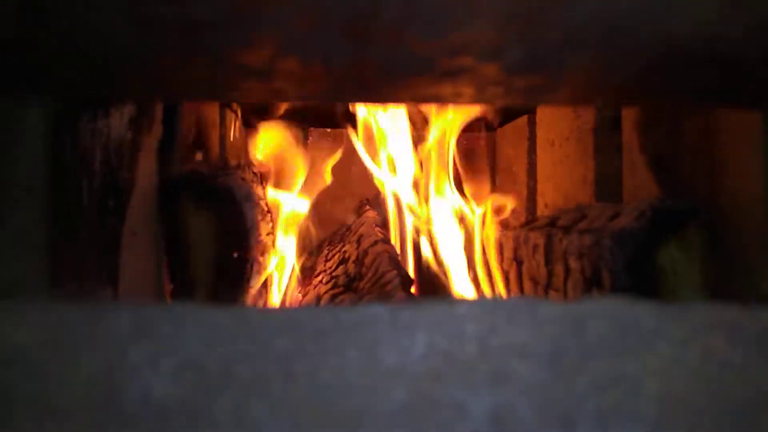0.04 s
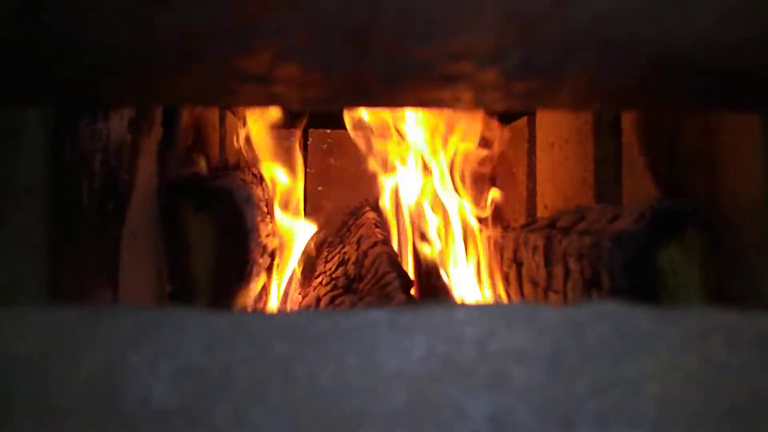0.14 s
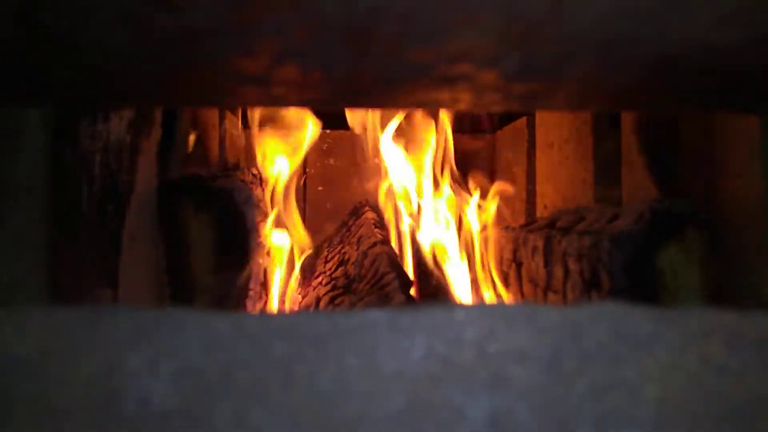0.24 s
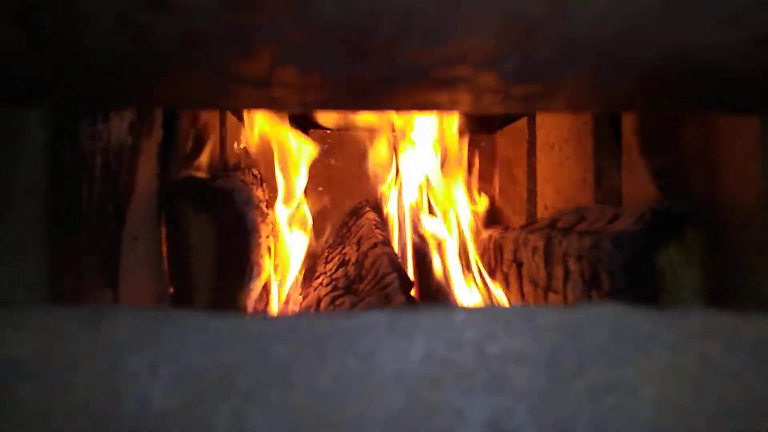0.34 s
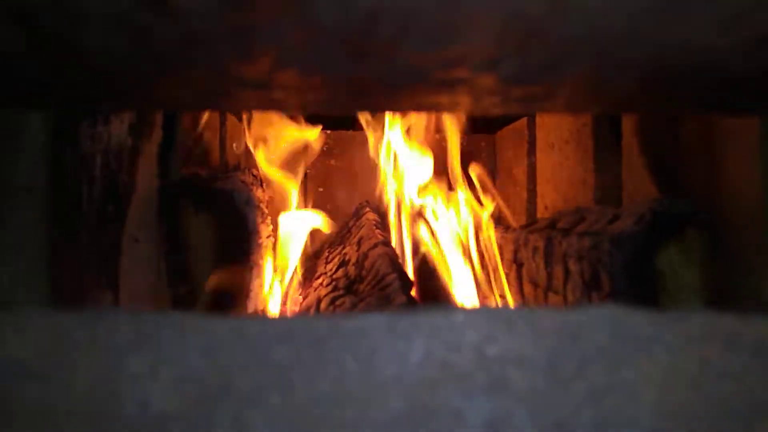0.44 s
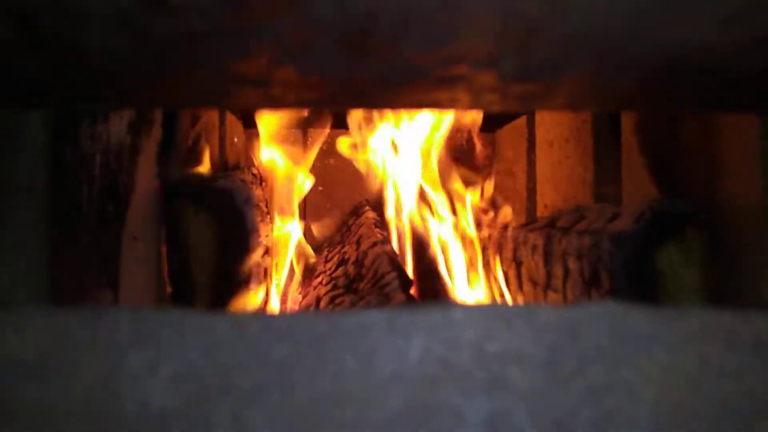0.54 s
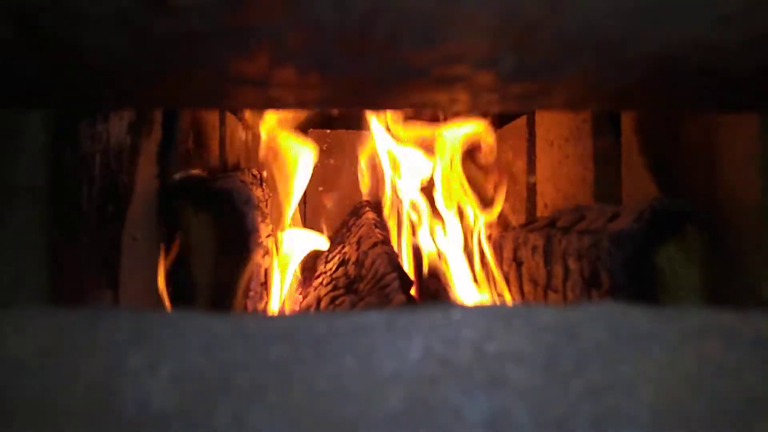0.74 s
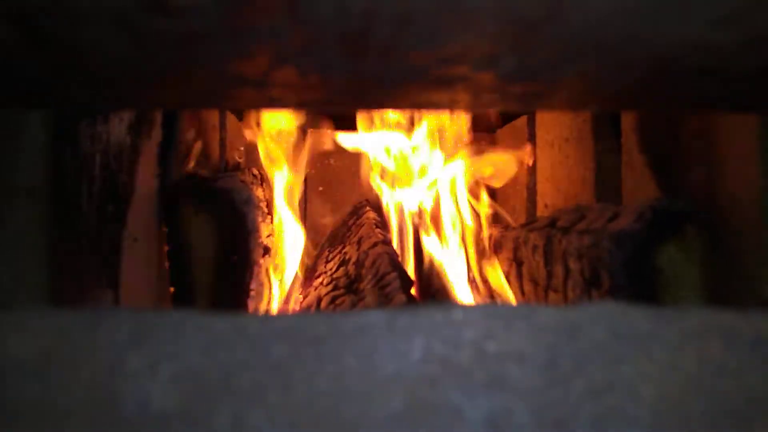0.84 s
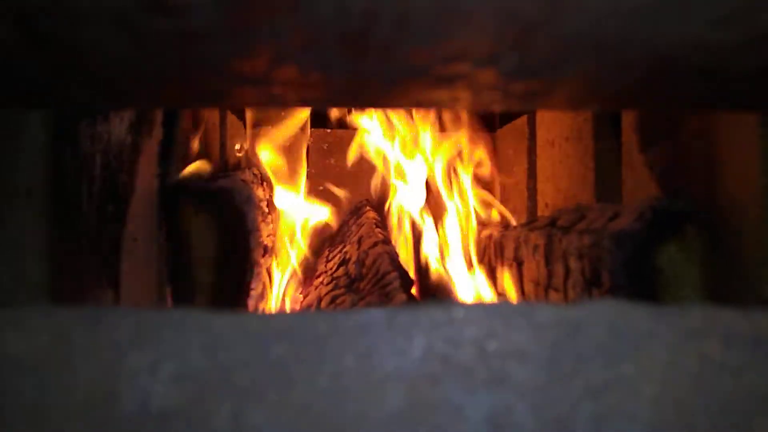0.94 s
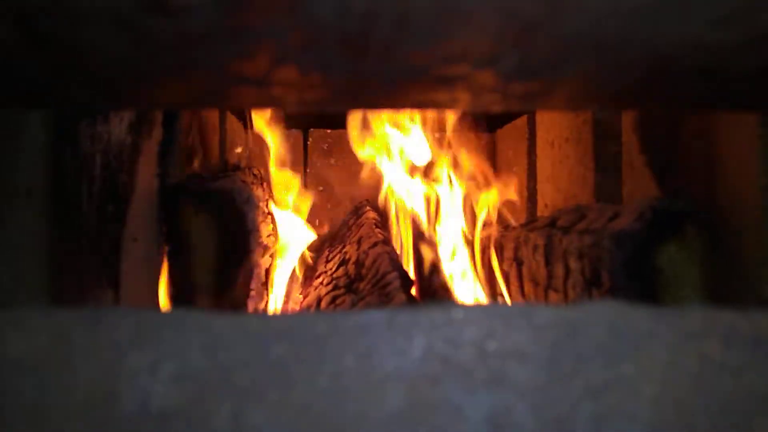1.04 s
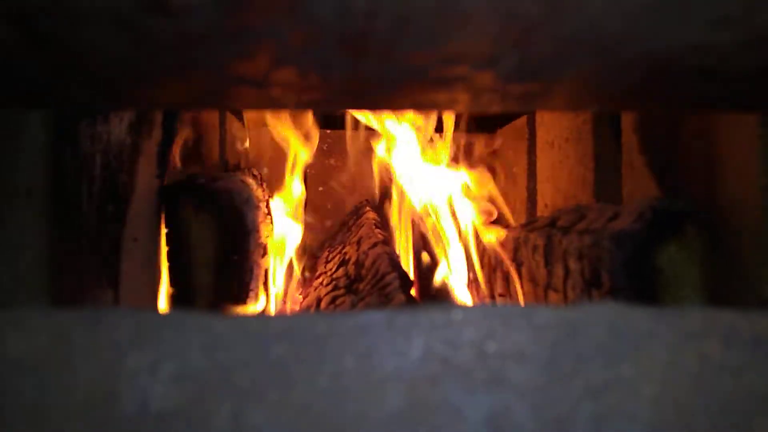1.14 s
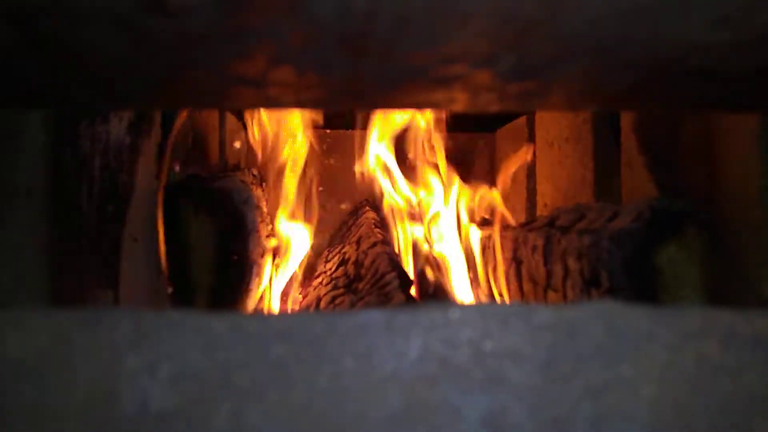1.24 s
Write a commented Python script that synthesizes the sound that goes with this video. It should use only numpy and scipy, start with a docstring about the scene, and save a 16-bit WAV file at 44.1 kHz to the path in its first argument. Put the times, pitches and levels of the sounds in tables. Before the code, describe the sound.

A log fire crackles close by in an indoor firebox: sharp bright ticks, a loud snapping pop early, a duller, punchier pop later, then a cluster of ticks over faint sizzling and steady low rumble.

```python
"""Crackling logs in a firebox

Logs burn in the open firebox of a boiler, indoors. Pockets in the wood burst: many small bright ticks
and two loud pops, made of shaped noise bursts and fading tones, with echoes from the firebox and room.
Faint knocks of settling embers are dull noise with a short ring. Gas sizzles out in spurts of bright noise
among random tiny cracks, and the flames rumble and flutter softly below as low noise."""
import sys
import numpy as np
from scipy import signal
from scipy.fft import rfft, irfft
from scipy.io import wavfile
from scipy.ndimage import uniform_filter1d

SR = 44100
rng = np.random.default_rng(int(sys.argv[2]) if len(sys.argv) > 2 else 0)


def wrap_up_sound(samples):
    """Save the sound to the file named by the first command line argument, as 16-bit audio."""
    columns = np.atleast_2d(samples).T
    # keep every value between -1 and 1, then stretch to whole-number steps
    tamed = np.clip(columns, -1, 1)
    steps = np.round(tamed * 32767).astype(np.int16)
    wavfile.write(sys.argv[1], SR, steps)


N = 57330
T = np.arange(N) / SR  # time of each sample, in seconds

# Bright hiss of escaping gas, also used for sharp cracks: pitch_hz, level_db (per Hz, relative)
HISS_SPECTRUM = [(2000, -33), (4000, -25.5), (5300, -13), (7500, -6), (8800, -2), (10000, 3.5), (12000, 0),
                 (16000, -3)]
# How lively the fine crackle and the sizzle are over time: time_s, change_db
ACTIVITY = [(0, 1.5), (.19, 7), (.3, 11), (.55, 1.5), (.64, 7), (.70, -12), (.80, -5), (.86, 19),
            (1.06, 1.5), (1.15, 12), (1.3, -1)]
# In all names, T60 is the time a sound takes to fade by 60 dB; HOLD runs from the start of the sound.
TICK_T60_S = 0.038
SPIKE_T60_S = 0.002
POP_ATTACK_S, POP_HOLD_S = 0.00062, 0.0019
FIREBOX_T60_S, ROOM_T60_S = 0.11, 0.42
RIPPLE = rng.standard_normal(2000)  # random strengths of the firebox's countless weaker resonances


def pops():
    """A pocket bursts: a snap, ringing wood, echoes, and a punch of gas that makes the firebox boom."""
    # Loud pops: start_s, snap_db, splinter_ring_db, log_ring_db, woody_body_db, echo_db, late_echo_db,
    # punch_db, boom_db, boom_hz, boom_t60_s, thump_db
    pop_list = [(0.2334, -9, -15.5, -53, -41.5, -31.5, -63, -40, -42.5, 139.9, .13, -51),
                (0.8914, -24, -49, -32.5, -42, -36.5, -63, -26, -36.5, 103.6, 0.064, -41)]
    out = np.zeros(N)
    for (start, snap_db, splinter_db, log_db, body_db, echo_db, late_db,
         punch_db, boom_db, boom_hz, boom_t60, thump_db) in pop_list:
        out += snap(start, snap_db)
        out += wood_ringing(start, splinter_db, log_db)
        out += woody_body([(start, body_db)])
        out += pop_echoes(start, echo_db, late_db)
        out += from_db(punch_db) * punch(start)
        out += from_db(boom_db) * boom(start, boom_hz, boom_t60)
        out += from_db(thump_db) * thump(start)
    return out


def snap(start, level_db):
    """The wood tears with a burst of bright noise, sharpened by a very short hiss at its front."""
    # Colour of the snap: pitch_hz, level_db (per Hz, relative)
    snap_spectrum = [(3300, -24), (4500, -22.5), (6000, -10), (8000, -5), (9600, 4.5), (11200, 3.5),
                     (13000, -16), (16000, -28)]
    burst = even(noise(snap_spectrum), size=100) * envelope(start, POP_ATTACK_S, POP_HOLD_S, t60=0.021)
    spike_level = from_db(-1) * envelope(start, POP_ATTACK_S, POP_ATTACK_S, SPIKE_T60_S)
    spike = even(noise(HISS_SPECTRUM), size=100) * spike_level
    return from_db(level_db) * (burst + spike)


def wood_ringing(start, splinter_db, log_db):
    """The splinter and the log each vibrate at their own pitches, and the room holds on to the log."""
    # Tones of the splintering wood: pitch_hz, level_db, t60_s
    splinter_modes = [(235, -29.5, 0.021), (523, -24, .05), (701, -27, 0.089), (875, -27.5, 0.033),
                      (1213, -33, .03), (1920, -24, .03), (2286, -29, 0.046), (5112, -15.5, .022),
                      (5974, -11.5, .03), (8230, -13.5, 0.043), (9320, -5, .04), (10220, 2.5, .028),
                      (10900, 4, 0.013), (11620, -4.5, .015)]
    # Tones of a log: pitch_hz, level_db, t60_s
    log_modes = [(536, -6.5, 0.018), (668, -7, 0.035), (1464, -5.5, 0.034), (2406, -8.5, 0.028),
                 (4420, -9, .025), (4780, -5, 0.021), (5970, 1, .02), (7230, 4, .028), (9610, 9.5, .03)]
    splinter = from_db(splinter_db) * ring(splinter_modes, start)
    log = from_db(log_db) * ring(log_modes, start)
    log_echo = from_db(log_db - 24) * ring_echo(log_modes, start)
    return splinter + log + log_echo


def ring(modes, start):
    """One burst sets several tones ringing, each fading at its own speed."""
    out = np.zeros(N)
    for hz, db, t60 in modes:
        tone = np.sin(2 * np.pi * (hz * T + rng.random()))  # random starting point in the cycle
        out += from_db(db) * tone * envelope(start, POP_ATTACK_S, POP_HOLD_S, t60)
    return out


def ring_echo(modes, start):
    """The room holds on to the ringing as wavering bands around each tone, the low ones favoured."""
    tilt_db, waver_rate_hz = 2, 130  # loss per octave; new random points per second
    bands = np.zeros(N)
    for hz, db, _ in modes:
        sine_part = drift(waver_rate_hz) * np.sin(2 * np.pi * hz * T)
        cosine_part = drift(waver_rate_hz) * np.cos(2 * np.pi * hz * T)
        bands += from_db(db - tilt_db * np.log2(hz / 1000)) * (sine_part + cosine_part)
    return bands * envelope(start, 0.01, 0.004, ROOM_T60_S)


def pop_echoes(start, echo_db, late_db):
    """The snap rattles round the firebox and room; a dull echo returns from the far end of the room."""
    # Colour of the bright echo: pitch_hz, level_db (per Hz, relative)
    echo_spectrum = [(3300, -21.5), (4800, -17), (6400, -14), (8600, -1.5), (9700, 0.5), (10700, -2),
                     (12000, -15.5), (14000, -25.5), (16000, -22.5)]
    # Colour of the dull late echo: pitch_hz, level_db (per Hz, relative)
    late_spectrum = [(250, -5.5), (400, 12), (520, -2), (680, 11.5), (850, 3.5), (1200, -11), (2500, -8),
                     (5000, -31)]
    room_db, late_delay_s = -11.5, 0.082  # room level relative to the firebox
    echo = noise(echo_spectrum) * tail(start, echo_db, echo_db + room_db)
    late_level = from_db(late_db) * envelope(start + late_delay_s, 0.0098, 0.017, t60=0.14)
    return echo + noise(late_spectrum) * late_level


def punch(start):
    """The burst of gas is one push and pull of the air, thrown back by the firebox wall."""
    length_s, return_delay_s, return_db = 0.0047, 0.017, -17

    def wave(age):
        return np.sin(2 * np.pi * np.clip(age / length_s, 0, 1))
    return wave(T - start) + from_db(return_db) * wave(T - start - return_delay_s)


def boom(start, hz, t60):
    """The firebox answers the punch with one low tone, slightly late."""
    boom_start = start + 0.023
    return np.sin(2 * np.pi * hz * (T - boom_start)) * envelope(boom_start, 0.0015, 0.011, t60)


def thump(start):
    """The punch also makes the firebox thump: a short burst of low noise."""
    # Colour of the thump: pitch_hz, level_db (per Hz, relative)
    thump_spectrum = [(30, -27), (60, -0.5), (110, 5.5), (170, 3.5), (300, -15), (500, -24), (1000, -58)]
    return even(noise(thump_spectrum), size=600) * envelope(start, 0.0013, hold=0.03, t60=0.0962)


def ticks():
    """Each small crack is a sharp spike and a millisecond burst around its own pitch, smeared by walls."""
    # Small cracks: start_s, level_db, spike_db (relative), centre_hz, width_hz, low_edge_hz,
    # woody_body_db (relative)
    tick_list = [(0.0426, -50.5, 0.5, 11000, 2260, 5750, -34), (0.1186, -40.5, 4, 11000, 2080, 4450, -18),
                 (0.163, -60.5, -11, 6200, 898, 5390, -31), (0.166, -57, 2, 11100, 2550, 4900, -12),
                 (0.2074, -51.5, -3, 9300, 2930, 4300, -18.5), (0.507, -64, -4, 12600, 3020, 7810, -52),
                 (0.531, -55.5, -7, 10500, 2710, 5225, -24), (0.613, -63, -4, 8740, 2212, 5500, -43),
                 (0.6217, -51.5, 16, 10200, 3110, 4300, -26), (.8235, -60, -4, 12000, 2800, 5000, -34),
                 (0.849, -43.5, 6.5, 10170, 2480, 5550, -53), (0.873, -49, -2, 8640, 1836, 4130, -18),
                 (1.0979, -36, 8.5, 11400, 2360, 6050, -75), (1.122, -57, 9, 7590, 2460, 5470, -50),
                 (1.1301, -46, 9.5, 11550, 2650, 6150, -66), (1.147, -53, 11, 9600, 2410, 5500, -56),
                 (1.1901, -44, 4, 8600, 1260, 4700, -34), (1.1888, -65, -11, 3200, 230, 2920, -29),
                 (1.198, -38, 17.5, 12970, 1160, 5000, -39), (1.2176, -50.5, -11, 8950, 3400, 3340, -24)]
    attack_s, firebox_echo_db, room_echo_db = 0.00039, -13, -30
    out = woody_body([(start, db + body_db) for start, db, *_, body_db in tick_list])
    hz = np.geomspace(1000, 20000, num=120)
    for start, db, spike_db, centre_hz, width_hz, edge_hz, _ in tick_list:
        colour_db = -20 * np.log10(1 + ((hz - centre_hz) / width_hz) ** 2)
        burst = envelope(start, attack_s, hold=0.0009, t60=TICK_T60_S)
        spike = from_db(spike_db) * envelope(start, attack_s, hold=0.0004, t60=SPIKE_T60_S)
        echoes = tail(start, firebox_echo_db, room_echo_db)
        level = np.sqrt(burst ** 2 + spike ** 2 + echoes ** 2)
        crack = even(noise(np.c_[hz, colour_db]), size=100) * level
        out = out + from_db(db) * high_pass(crack, edge_hz)
    return out


def woody_body(cracks):
    """The log gives a dull midrange knock under each crack (start_s, level_db), with reflections."""
    # Colour of the direct knock: pitch_hz, level_db (per Hz, relative)
    body_spectrum = [(150, 1), (350, -8), (530, 1), (720, 3.5), (880, -0.5), (1050, -3.5), (1450, -2.5),
                     (2000, -2.5), (2450, -4.5), (3300, -8), (4600, -3), (7000, -7)]
    # Colour of its reflections: pitch_hz, level_db (per Hz, relative)
    body_echo_spectrum = [(150, 5.5), (330, -8.5), (520, 1.5), (700, 1), (860, 0.5), (1100, -3), (1450, -2),
                          (1950, -3.5), (2450, 0), (3300, -7.5), (4600, 0), (7000, -12)]
    direct_power = np.zeros(N)
    echo_power = np.zeros(N)
    for start, db in cracks:
        direct_power += (from_db(db) * envelope(start, 0.0011, POP_HOLD_S, t60=0.13)) ** 2
        echo_power += (from_db(db) * tail(start, firebox_db=-11, room_db=-13)) ** 2
    direct = even(noise(body_spectrum), size=300) * np.sqrt(direct_power)
    return direct + noise(body_echo_spectrum) * np.sqrt(echo_power)


def crackle():
    """Tiny cracks prickle at random, each a fading burst of bright noise."""
    cracks_per_s, smallest_db, range_db = 49, -67.5, 9  # smallest level is before the activity change
    activity_db = np.interp(T, *np.transpose(ACTIVITY))
    sizes = from_db(smallest_db + activity_db + range_db * rng.random(N) ** 2)  # mostly small ones
    born = rng.random(N) < cracks_per_s / SR
    keep = from_db(-60 / (TICK_T60_S * SR)) ** 2  # share of the power left after one sample
    power = signal.lfilter([1], [1, -keep], (sizes * born) ** 2 + 1e-18)
    return high_pass(noise(HISS_SPECTRUM) * np.sqrt(power), hz=4868)


def sizzle():
    """Gas hisses out of the wood as flickering bright noise, in a changing stream and in spurts."""
    # Spurts of gas: start_s, length_s (before the fall), level_db
    spurt_list = [(0, .09, -66), (0.343, 0.069, -56.5), (0.852, 0.038, -50.5), (1.134, 0.25, -65.5)]
    stream_db, rise_s, fall_s, flicker_db = -76, 0.0027, 0.033, 1.5  # stream before the activity change
    power = from_db(stream_db + np.interp(T, *np.transpose(ACTIVITY))) ** 2
    for start, length, db in spurt_list:
        rise = np.clip((T - start) / rise_s, 0, 1)
        fall = np.exp(-np.maximum(T - start - length, 0) / fall_s)
        power = power + (from_db(db) * rise * fall) ** 2
    return noise(HISS_SPECTRUM) * np.sqrt(power) * from_db(flicker_db * drift(210))


def knocks():
    """Embers settle with faint dull knocks, each with a short hollow ring of its own."""
    # Soft knocks: start_s, level_db, ring_hz
    knock_list = [(0.078, -70.5, 1013), (0.118, -59, 713), (.145, -65, 483), (0.495, -73.5, 880),
                  (0.541, -72, 912), (0.758, -62.5, 936), (1.111, -67, 696), (1.181, -64.5, 530)]
    # Colour of the knocks: pitch_hz, level_db (per Hz, relative)
    knock_spectrum = [(150, -10), (300, 16), (520, -1.5), (700, -18.5), (930, -21), (1400, -28.5),
                      (4000, -32)]
    power = np.zeros(N)
    rings = np.zeros(N)
    for start, db, hz in knock_list:
        power += (from_db(db) * envelope(start, 0.0016, hold=0.0039, t60=0.18)) ** 2
        rings += ring([(hz, db - 7, 0.05)], start)  # 7 dB below the knock
    return even(noise(knock_spectrum), size=500) * np.sqrt(power) + rings


def flames():
    """The draught rumbles steadily in the firebox while the flames flutter above it, both as noise."""
    # Colour of the rumble: pitch_hz, level_db (per Hz, relative)
    rumble_spectrum = [(20, -29.5), (35, -26), (52, 2), (80, -2.5), (112, 0), (140, -5.5), (170, -12.5),
                       (240, -23), (320, -27.5), (420, -40.5), (700, -59), (1200, -55.5), (3000, -68),
                       (16000, -45)]
    # Colour of the flutter: pitch_hz, level_db (per Hz, relative)
    flutter_spectrum = [(100, -19.5), (180, -3), (310, 7.5), (450, -12.5), (650, -24.5), (1200, -29.5),
                        (3000, -45)]
    # Loudness of the flutter over time: time_s, level_db
    flutter_level = [(0, -73), (.2, -70), (.38, -80.5), (.52, -74.5), (.72, -69.5), (.82, -70.5),
                     (.97, -59.5), (1.08, -65.5), (1.16, -64.5), (1.3, -82.5)]
    rumble = even(noise(rumble_spectrum), size=4000) * from_db(-50.5)
    flutter = noise(flutter_spectrum) * from_db(np.interp(T, *np.transpose(flutter_level)))
    return rumble + flutter


def tail(start, firebox_db, room_db):
    """Level of the reflections: the firebox dies quickly, the room slowly."""
    firebox = from_db(firebox_db) * envelope(start, 0.009, 0.001, FIREBOX_T60_S)
    room = from_db(room_db) * envelope(start, 0.0043, 0.0013, ROOM_T60_S)
    return np.hypot(firebox, room)  # adds their powers


def firebox_db(hz):
    """The firebox strengthens some pitches and weakens others, in every noise played through it."""
    # Main resonances of the firebox: centre_hz, width_hz, boost_db
    resonances = [(70.4, 4, 3.5), (119, 15, -0.5), (135.3, 20, 7.5), (195, 22, 7), (320.6, 5.5, 13.5),
                  (392, 10, 6), (510, 20, 14.5), (690, 5, 12), (1020, 64, 6), (1706, 110, 4.5),
                  (2400, 180, 3), (5120, 340, 5.5), (5970, 270, 3), (7840, 230, 5), (8396, 160, 5.5),
                  (9130, 340, 3), (9700, 76, 5.5), (9200, 130, 5.5), (10600, 130, 3.5)]
    ripple_db, ripple_step_hz = 3, 60.98
    peaks = sum(db / (1 + (2 * (hz - centre) / width) ** 2) for centre, width, db in resonances)
    ripple = np.interp(hz / ripple_step_hz, np.arange(len(RIPPLE)), RIPPLE)
    fade_in = np.clip(hz / 1000 - 0.5, 0, 1)  # no ripple below 500 Hz, all of it from 1500 Hz
    return peaks + ripple_db * ripple * fade_in


def noise(spectrum):
    """Steady noise of unit rms with the given spectrum, coloured by the firebox."""
    hz, db = np.transpose(spectrum)
    bins = np.maximum(np.fft.rfftfreq(N, 1 / SR), 1)
    gain = from_db(np.interp(np.log(bins), np.log(hz), db) + firebox_db(bins))
    return rms_one(irfft(rfft(rng.standard_normal(N)) * gain, N))


def even(x, size):
    """Even out the level over stretches of so many samples."""
    return x / np.sqrt(np.abs(uniform_filter1d(x * x, size)) + 1e-12)


def drift(rate):
    """Random wandering of unit rms, with so many new points per second joined by straight lines."""
    knots = rng.standard_normal(2000)
    return rms_one(np.interp(T * rate, np.arange(len(knots)), knots))


def envelope(start, attack, hold, t60):
    """Level that rises in a straight line, then fades evenly in dB once the hold is over."""
    age = T - start
    return np.clip(age / attack, 0, 1) * from_db(-60 * np.maximum(age - hold, 0) / t60)


def high_pass(x, hz):
    """Steep cut of everything below a pitch."""
    steep_cut = signal.butter(8, np.clip(hz, 100, 15000), "high", fs=SR, output="sos")
    return signal.sosfilt(steep_cut, x + 1e-18)


def from_db(db):
    """Decibels to gain."""
    return 10 ** (np.asarray(db) / 20)


def rms_one(x):
    """Scale to unit rms (average strength)."""
    return x / np.sqrt(np.mean(x ** 2) + 1e-20)


def scene():
    """The whole fire: all layers added into one channel."""
    return (pops() + ticks() + crackle() + sizzle() + knocks() + flames())[None]


def record(dry):
    """The loudest peaks are rounded off, then the top of the treble is cut."""
    ceiling, cutoff_hz = 0.64, 15900
    rounded = ceiling * np.tanh(dry / ceiling)
    treble_cut = signal.ellip(10, 0.3, 80, cutoff_hz, fs=SR, output="sos")
    return signal.sosfilt(treble_cut, rounded)


dry = scene()
out = record(dry)
wrap_up_sound(out)
```